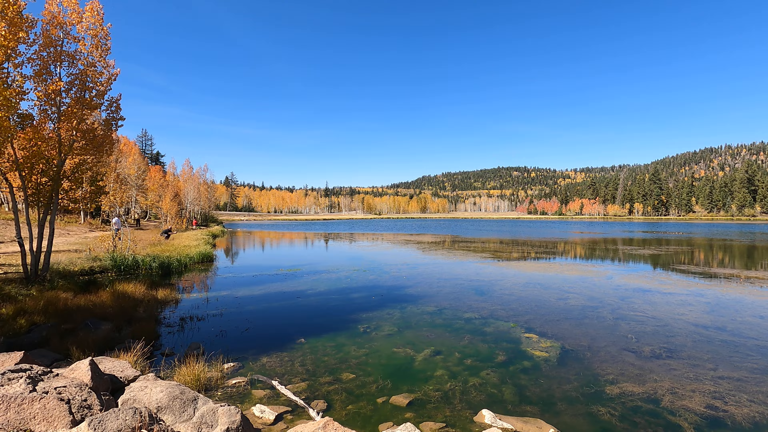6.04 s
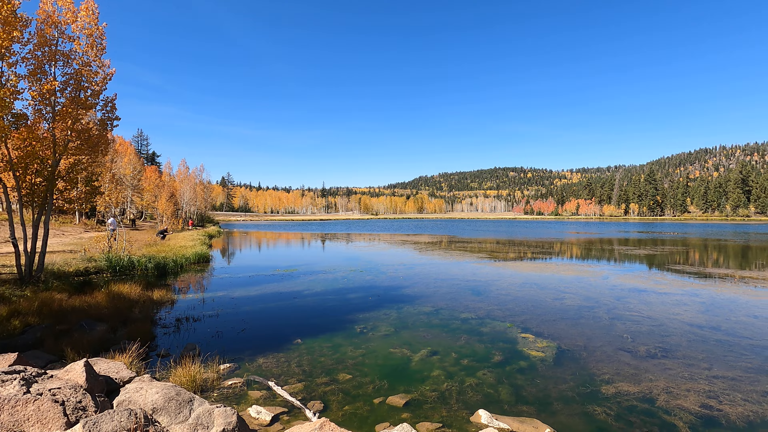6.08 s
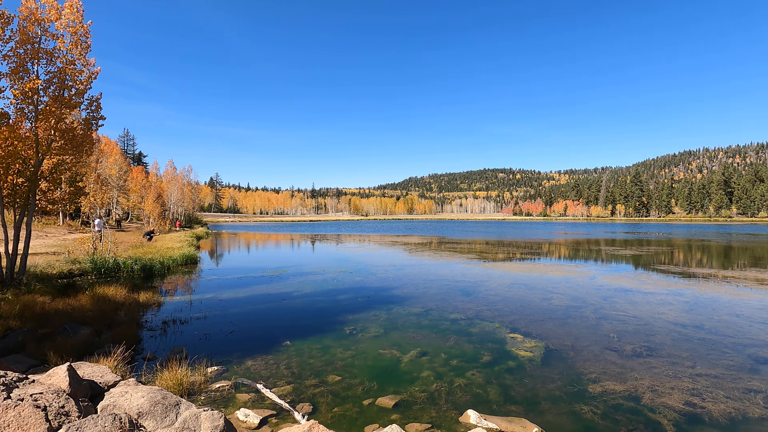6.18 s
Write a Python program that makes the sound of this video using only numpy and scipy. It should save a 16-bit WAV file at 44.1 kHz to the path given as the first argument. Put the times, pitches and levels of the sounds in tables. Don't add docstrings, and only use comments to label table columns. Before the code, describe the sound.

Open lakeshore with trees and rocks, recorded in stereo on an unprotected microphone. Heavy low wind buffeting dominates early, then drops away, leaving a soft far drone, rustling leaves and airy hiss. Rapid dry wing snaps crackle on the left throughout. Five short piercing chirps, rising then falling, come near the centre, the later three louder, each with a slight woodland echo. Sparse water plops and ticks.

```python
import sys
import numpy as np
from scipy import signal
from scipy.fft import rfft, irfft, next_fast_len
from scipy.io import wavfile
from scipy.ndimage import uniform_filter1d, map_coordinates

SR = 44100
rng = np.random.default_rng(int(sys.argv[2]) if len(sys.argv) > 2 else 0)


def waveform_to_disk(signal):
    frames = np.transpose(np.atleast_2d(signal))
    scaled = np.clip(frames, -1, 1) * 32767
    samples = np.round(scaled).astype(np.int16)
    wavfile.write(sys.argv[1], SR, samples)


def nominal_scale(level):
    x = np.asarray(level, float) / 20
    return 10 ** x


N = 274652


def unit(x):
    return x / np.sqrt(np.mean(x ** 2) + 1e-20)


def along(points, hz):
    f, v = np.transpose(points)
    return np.interp(np.log(hz + 1), np.log(f + 1), v)


def curves(rows):
    s, *cols = np.transpose(rows)
    return [np.interp(np.arange(N) / SR, s, c) for c in cols]


def wobble(rate_hz, size=N):
    knots = rng.standard_normal(int(size * rate_hz / SR) + 4)
    return map_coordinates(knots, [np.arange(size) * rate_hz / SR])


def filtered(x, response):
    m = next_fast_len(N + SR // 2)
    return irfft(rfft(x, m) * response(np.fft.rfftfreq(m, 1 / SR)), m)[..., :N]


def sides(pan_db):
    return nominal_scale(np.array([pan_db / 2, -pan_db / 2]))


def add(out, sound, s, pan_db):
    at = round(s * SR)
    out[:, at:at + sound.shape[-1]] += (sides(pan_db)[:, None] * sound)[:, :N - at]


def rush(spectrum, alike, patchy_db):
    z = signal.stft(rng.standard_normal((2, N + 512)), nperseg=512)[2]
    field = uniform_filter1d(rng.standard_normal(z.shape[1:]), size=6, axis=0)
    field = uniform_filter1d(field, size=12, axis=1)
    pair = signal.istft(z * nominal_scale(patchy_db * unit(field)), nperseg=512)[1][:, :N]

    def mid_side(hz):
        turn = np.arccos(np.clip(along(alike, hz), -1, 1)) / 2
        return nominal_scale(along(spectrum, hz)) * [np.cos(turn), np.sin(turn)]

    mid, side = filtered(pair, mid_side)
    return unit(np.array([mid + side, mid - side]))


def trees(x, t60_s, delay_s):
    t = np.arange(SR // 3) / SR
    tail = rng.standard_normal((2, len(t))) * nominal_scale(-60 * t / t60_s) * np.clip(t / delay_s, 0, 1)
    return signal.fftconvolve(x[None], tail / np.linalg.norm(tail[0]), axes=1)


def air():
    # (frequency [Hz], density [dB])
    drone_spectrum = [(53, -49), (90, -21), (118, -28), (141, -2), (172, -0.5), (227, -4.5), (270, -9),
                      (414, -11.5), (450, -14), (800, -23.5), (1040, -65), (1760, -120)]
    leaves_spectrum = [(530, -29), (900, -8), (942, -7), (1010, -2.5), (1190, -0.5), (1540, -1.5),
                       (1660, -3), (2040, -6), (3000, -10), (3900, -20.5), (6600, -120)]
    hiss_spectrum = [(1940, -40), (3300, -3.5), (4200, -2.5), (5540, 0.5), (6500, -1.5), (7620, -5.5),
                     (9000, -12), (10700, -18), (12000, -16.5), (12700, -21), (13500, -25), (15000, -28),
                     (15700, -48)]
    # (frequency [Hz], likeness [-1..1])
    likeness = [(60, 0.48), (150, 0.8), (380, 0.65), (950, 0.59), (2380, 0.57), (5980, 0.68), (15000, 0.18)]
    # (frequency [Hz], difference [dB])
    lean = [(60, 8), (150, -4), (380, -2.5), (950, -1.5), (2380, 2.0), (5980, 1.5), (15000, 7)]
    # (time [s], level [dB])
    far_engine = [(0, -66.5), (.8, -62.5), (1.2, -65), (2, -66), (3, -65), (4.3, -65.5), (5.2, -64.5),
                  (5.7, -62.5), (6.23, -62.5)]
    # (time [s], level [dB])
    breeze = [(0, -70.5), (1.1, -70.5), (2, -71.5), (3.9, -71), (4.9, -68.5), (5.6, -69), (6.23, -70.5)]
    leaves_mean_db, breeze_share = -68, 0.1
    (drone_db,), (hiss_db,) = curves(far_engine), curves(breeze)
    leaves_db = leaves_mean_db + breeze_share * (hiss_db - hiss_db.mean()) + 1.16 * wobble(2.97)
    far = nominal_scale(drone_db + 0.58 + 0.6 * wobble(4)) * rush(drone_spectrum, likeness, patchy_db=1.4)
    far += nominal_scale(leaves_db + 0.32 * wobble(13.0)) * rush(leaves_spectrum, likeness, patchy_db=1.58)
    far += nominal_scale(hiss_db + .9 + .3 * wobble(9)) * rush(hiss_spectrum, likeness, patchy_db=.5)
    return filtered(far, lambda hz: sides(along(lean, hz)))


def eddies():
    # (time [s], level [dB])
    blow = [(0, -54), (.24, -58), (.4, -45), (1.15, -47), (1.3, -45.5), (1.8, -58), (2.12, -66),
            (2.25, -51.5), (3.2, -47.5), (3.95, -72), (4.15, -85), (4.45, -65.5), (5.2, -60), (5.32, -80),
            (5.7, -64), (5.96, -78), (6.23, -74)]
    # (time [s], deep buffet [dB], flutter re buffet [dB], left-right [dB])
    rolls = [(.08, -51, -9.5, -2), (.3, -41.5, -16, 7), (.42, -35.5, -9, -2.5), (.54, -49, -2, 0),
             (.61, -45, -11, -7), (.68, -46.5, -2.5, 5), (.73, -34, -15, -6), (.88, -44.5, -2, 3),
             (.95, -43, -3.5, 2), (1.085, -32.5, -12, -1), (1.25, -54, -1.5, 0), (1.41, -47.5, -5, -5),
             (1.61, -41.5, -8, -2.5), (1.74, -47, -19, 4), (1.94, -45.5, -23, -6), (2.03, -61, 6, 0.5),
             (2.182, -38.5, -4.5, 0.5), (2.43, -36, -8.5, -1), (2.62, -40.5, -6, -4),
             (2.76, -49.5, -6, -0.5), (2.89, -41, -2, 4.5), (3.02, -34.5, -12, -2), (3.14, -33.5, -21, -4),
             (3.33, -40.5, -11.5, 0.5), (3.49, -47.5, -2.5, -3), (3.76, -50, -4.5, 14),
             (3.88, -47, -39, -9), (4.28, -49.5, -32, 0.5), (5.06, -64, -4, 3), (5.84, -58.5, -38, -10)]
    rise_db_per_s, fall_db_per_s, steady_flutter_db = 185.5, 106, -17.5
    blow_db, = curves(blow)
    deep = np.array([nominal_scale(2 * blow_db)] * 2)
    flutter = np.array([nominal_scale(2 * (blow_db + steady_flutter_db))] * 2)
    for s, db, flutter_db, pan_db in rolls:
        t = np.arange(N) / SR - s
        swell = nominal_scale(db + np.minimum(rise_db_per_s * t, -fall_db_per_s * t))
        power = (sides(pan_db)[:, None] * swell) ** 2
        deep = deep + power
        flutter = flutter + nominal_scale(2 * flutter_db) * power
    return np.sqrt(deep), np.sqrt(flutter)


def whistle(rows):
    pitch_hz, db = curves(rows)
    t = np.arange(N) / SR
    gate = np.clip(np.minimum(t - rows[0][0], rows[-1][0] - t) / 0.022, 0, 1)
    level = np.sqrt(2) * gate * nominal_scale(db - 1 + 1.5 * wobble(30))
    return level * np.sin(2 * np.pi * np.cumsum(pitch_hz * (1 + 0.012 * wobble(40))) / SR)


def wind():
    # (frequency [Hz], density [dB])
    deep_spectrum = [(8, -29), (14, -5.5), (30, -2.5), (48, 0.5), (62, -17), (75, -42), (100, -120)]
    flutter_spectrum = [(36, -30), (62, 1), (131, -14), (178, -24.5), (233, -23), (258, -28.5), (330, -31),
                        (430, -67), (730, -120)]
    # (time [s], peak [dB], left-right [dB])
    thumps = [(0.141, -47.5, 1), (0.332, -41.5, 0), (0.411, -38, -10), (0.652, -28.5, 12.5),
              (0.823, -37, 12), (0.95, -35, 15), (1.06, -38.5, 16), (1.618, -50, -2), (1.835, -57, -3.0),
              (1.994, -54, 0.5), (2.487, -40, -10), (2.71, -49, 2.0), (2.803, -61, -3.0), (2.861, -52, 9),
              (3.223, -39.5, -9), (3.641, -49.5, -5)]
    # (time [s], pitch [Hz], rms level [dB])
    whistles = [
        [(0.16, 490.4, -85), (0.17, 512, -76), (0.236, 510, -70), (0.282, 560, -77), (0.31, 579.4, -89)],
        [(0.5, 329.8, -60), (0.572, 364, -80), (0.606, 392.7, -68.5), (0.64, 379.7, -71), (0.718, 443, -68.5),
         (0.852, 423, -65.5), (0.894, 387, -66), (0.93, 405, -78)],
    ]
    deep_gain, flutter_gain = eddies()
    deep_lumps = nominal_scale(2.54 * np.array([wobble(16), wobble(16)]))
    deep = unit(deep_lumps * rush(deep_spectrum, [(30, 0.48)], patchy_db=0.5))
    flutter_lumps = nominal_scale(2.6 * np.array([wobble(24), wobble(24)]))
    flutter = unit(flutter_lumps * rush(flutter_spectrum, [(60, .4), (300, .5)], patchy_db=1.2))
    out = nominal_scale(-1.5) * deep_gain * deep + nominal_scale(2.35) * flutter_gain * flutter
    for (s, db, pan_db), (sign, size) in zip(thumps, rng.standard_normal((len(thumps), 2))):
        width_s = 0.0032 * (1 + 0.17 * np.clip(size, -2, 2))
        u = np.arange(-600, 600) / (SR * width_s)
        push = np.sign(sign) * nominal_scale(db - 1.5) * (1 - u ** 2) * np.exp(-u ** 2 / 2)
        add(out, push, s - .004, pan_db)
    return out + sum(whistle(rows) for rows in whistles)


def drops():
    # (time [s], peak [dB], pitch [Hz], length [cycles], left-right [dB])
    plops = [
        (1.2565, -48, 3300, 1.8, 1),
        (2.9, -57, 1650, 9, 1),
        (3.472, -56, 4500, 4, 4),
        (3.499, -59, 2200, 5, 1),
        (3.813, -38, 1374, 6.2, 2),
        (4.480, -53.5, 560, 4.2, -5),
        (4.748, -50, 5200, 8, 4),
        (4.753, -54, 4500, 8, 4),
        (5.195, -59, 5000, 3, 9),
        (5.64, -62.5, 458, 32, -2),
    ]
    out = np.zeros((2, N))
    for s, db, hz, cycles, pan_db in plops:
        turns = np.arange(int(cycles * SR / hz)) * hz / SR
        swell = nominal_scale(db) * np.sin(np.pi * turns / cycles) ** 2.5
        ring = swell * np.sin(2 * np.pi * turns * (1 + 0.012 * turns / cycles))
        add(out, ring, s, pan_db)
        add(out, nominal_scale(-8.0) * trees(ring, t60_s=0.11, delay_s=0.0053), s, pan_db)
    return out


def grasshopper():
    # (frequency [Hz], width [Hz], level [dB])
    wing = [(4360, 1400, 3.5), (7700, 2540, 2), (9600, 990, 2), (11840, 1200, -4.5), (14500, 2000, -28)]
    # (time [s], opening snap [dB], closing snap [dB])
    pairs = [(.0720, -54.5, -55.5), (.3571, -65, -61), (.8470, -60, -57), (1.2138, -69, -59),
             (1.3877, -63, -58.5), (1.564, -59, -56.5), (1.7430, -58, -57), (2.1046, -66, -62),
             (2.2619, -57, -55.5), (2.4482, -54, -58), (2.6277, -56, -55), (2.9425, -57, -55.5),
             (3.1198, -63, -58.5), (3.4575, -58, -56.5), (3.7712, -64, -60), (4.1081, -62, -62),
             (4.2961, -69, -58.5), (4.6562, -56.5, -53.5), (4.8341, -53, -51.5), (5.011, -55, -61),
             (5.3655, -59, -56), (5.5410, -62, -55), (5.8877, -64, -61), (6.0723, -61, -59)]
    # (time [s], peak [dB])
    singles = [(.2239, -58), (.5282, -64), (.7128, -65), (1.0435, -67), (1.917, -59.5), (3.3199, -56.5),
               (3.6152, -55.5), (3.9235, -68), (3.9514, -60), (4.4932, -56), (4.7626, -62), (5.1851, -59),
               (5.7219, -57.5), (6.2068, -60)]
    stroke_s, slows_s_per_s = .0207, .0004
    side_db, side_scatter_db = 13, -1
    out, t = np.zeros((2, N)), np.arange(200) / SR
    snaps = singles + [(s, db) for s, db, _ in pairs]
    snaps = snaps + [(s + stroke_s + slows_s_per_s * s, db) for s, _, db in pairs]
    near, far = rng.standard_normal((2, len(snaps), len(t))) * nominal_scale(-60 * t / 0.0066)
    for (s, db), left, other, turn in zip(snaps, near, far, rng.standard_normal(len(snaps))):
        left = left / np.linalg.norm(left) * 3
        burst = nominal_scale(db + 7.0) * np.array([left, .5 * left + 0.63 * other])
        add(out, burst, s + .0008, side_db + side_scatter_db * turn)
    out += nominal_scale(-10) * trees(out[0], t60_s=.15, delay_s=.002)[:, :N] * sides(5.5)[:, None]

    def ringing(f):
        return sum((-1) ** k * nominal_scale(db) * 1j * f * w / (c * c - f * f + 1j * f * w)
                   for k, (c, w, db) in enumerate(wing))

    return filtered(out, ringing)


def chirps():
    # (time [s], length [s], top pitch [Hz], rms level [dB], head turned [0-1])
    calls = [
        (1.188, .056, 2085, -60, 0),
        (2.435, .061, 2140, -56.5, 0),
        (3.387, .057, 2090, -52, 1),
        (4.168, .054, 2170, -51, 1),
        (5.099, .061, 2085, -52.5, 1),
    ]
    # (first pitch [Hz], lingering on it [0-1], upper partials [dB], their loss over the call [dB])
    poses = [
        (1870, 0.17, -2, -10),
        (1700, 0.31, 2, -10),
        (1780, .6, -7, -3),
        (1650, 1, 0, -10),
        (1640, 0.85, 4.5, -13),
    ]
    # (frequency [Hz], gain [dB])
    facing_colour = [(1600, -8), (2100, -3), (3400, -18), (3750, -5), (4100, 0), (4300, -2), (5300, -18),
                     (5800, -1), (6300, -1), (6500, -6), (7100, -22), (7900, -22), (8500, -15), (9200, -32)]
    turned_colour = [(1600, -20), (2100, -18), (3300, -26), (3500, -14), (3750, -3), (4000, 0), (4350, -6),
                     (5100, -3), (5500, -7), (5850, -24), (6350, -7), (6700, -9), (7200, -24), (8300, -26)]
    last_hz, crest, lowest_db = 1735, .46, -1.5
    out = np.zeros((2, N))
    for (s, length_s, top_hz, db, turned), (first_hz, linger, upper_db, loss_db) in zip(calls, poses):
        u = np.arange(SR // 14) / (SR * length_s)
        size = len(u)
        rise = np.sin(np.pi / 2 * np.clip(u / crest, 0, 1))
        climb = (1 - linger) * rise + linger * rise ** 2.7
        fall = np.clip((u - crest) / (1 - crest), 0, 1) ** 1.6
        hoarse = (.7 + .3 * turned) * (1 + 1.5 * np.exp(-u / .2))
        pitch_hz = first_hz + (top_hz - first_hz) * climb - (top_hz - last_hz) * fall
        pitch_hz = pitch_hz * (1 + 0.011 * hoarse * wobble(380, size))
        phase = 2 * np.pi * np.cumsum(pitch_hz) / SR
        effort = np.clip(u / .16, 0, 1) * np.clip((1 - u) / .14, 0, 1)
        call = 0
        for k in range(1, 5):
            colour_db = (1 - turned) * along(facing_colour, k * pitch_hz)
            colour_db += turned * along(turned_colour, k * pitch_hz)
            if k == 1:
                colour_db += lowest_db - 2.5 * turned - 6 * np.exp(-u / .25)
            if k > 2:
                colour_db += upper_db + loss_db * u
            colour_db += (.8 + .5 * k) * wobble(240, size)
            jitter = (k > 2) * .3 * hoarse * wobble(1500, size)
            call = call + np.sqrt(2) * effort * nominal_scale(db + colour_db) * np.sin(k * phase + jitter)
        call = call * (1 + .13 * hoarse * wobble(1400, size))
        add(out, call, s, 1.5)
        add(out, nominal_scale(-11) * trees(call, t60_s=.04, delay_s=.002), s, 1.5)
        add(out, nominal_scale(-11) * trees(call, t60_s=.35, delay_s=.004), s, 1.2)
    return out


def scene():
    return air() + wind() + drops() + grasshopper() + chirps()


def top_cut(x):
    return signal.sosfilt(signal.butter(12, 15700, fs=SR, output="sos"), x)


def record(dry):
    top_hz = 15700
    mix = filtered(dry, lambda hz: hz < top_hz)
    return top_cut(mix)


dry = scene()
out = record(dry)
waveform_to_disk(out)
```